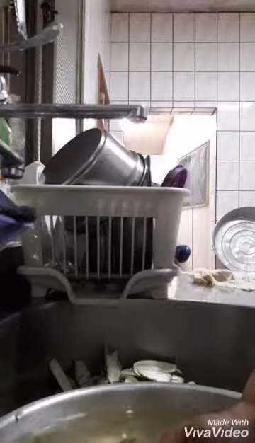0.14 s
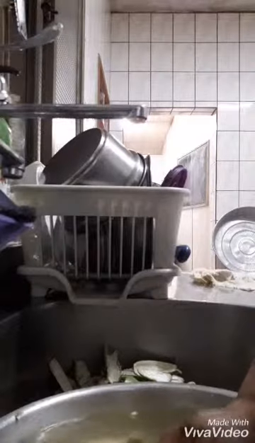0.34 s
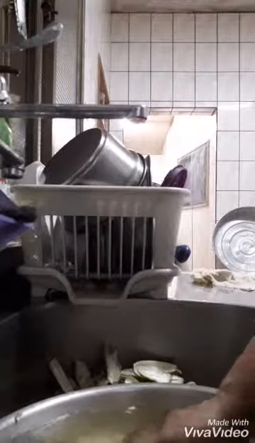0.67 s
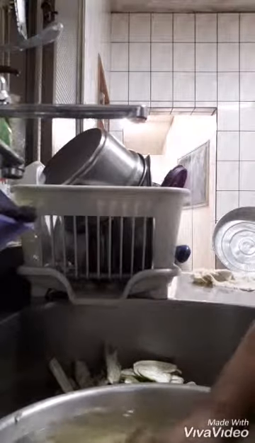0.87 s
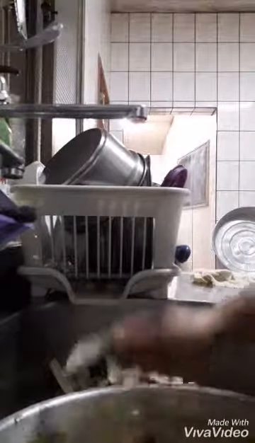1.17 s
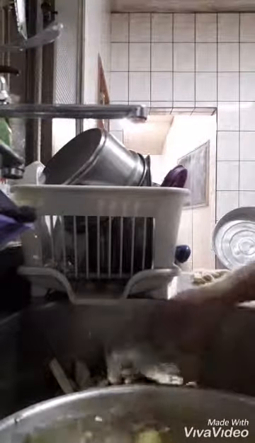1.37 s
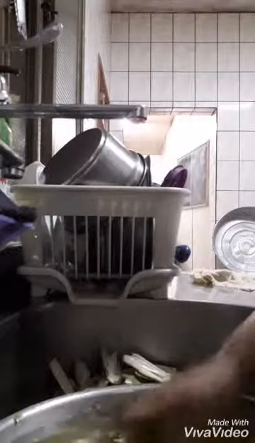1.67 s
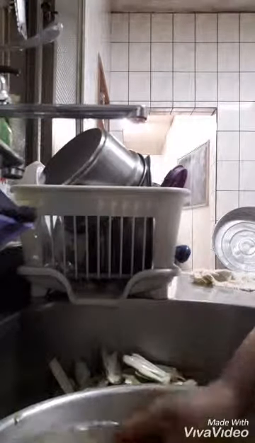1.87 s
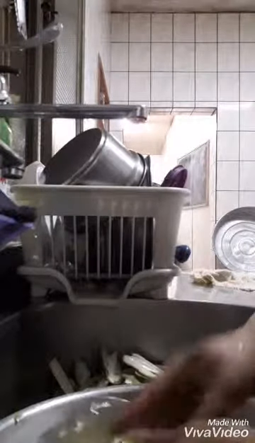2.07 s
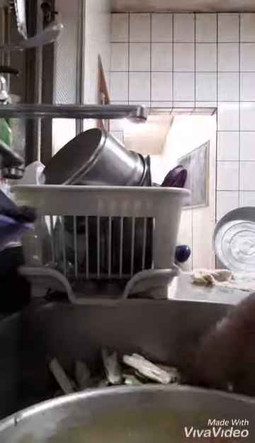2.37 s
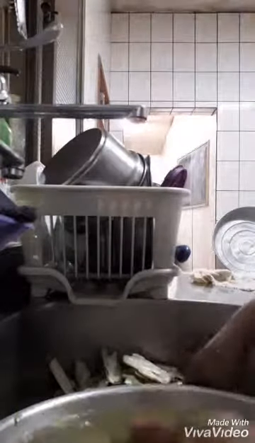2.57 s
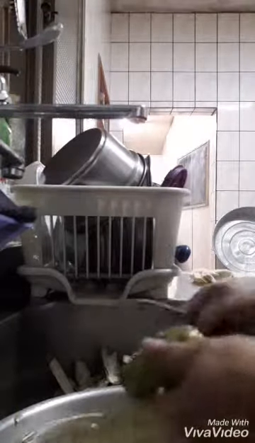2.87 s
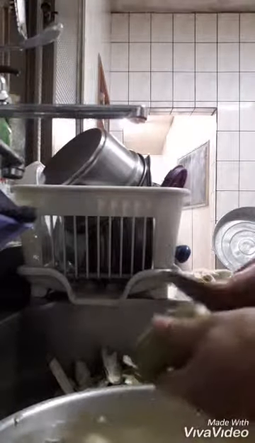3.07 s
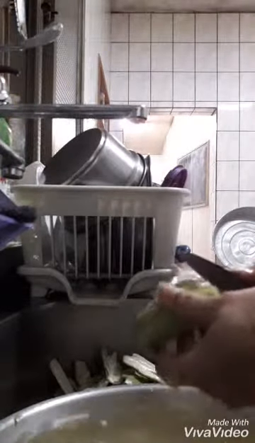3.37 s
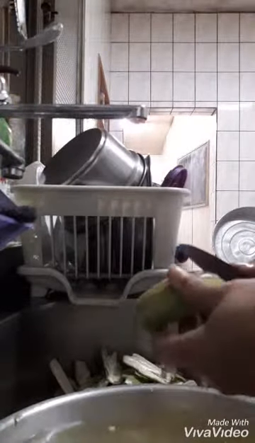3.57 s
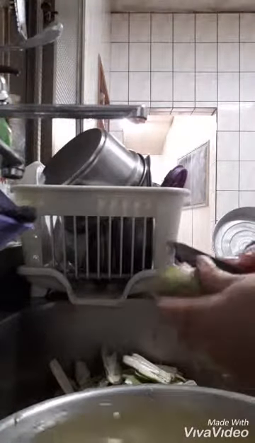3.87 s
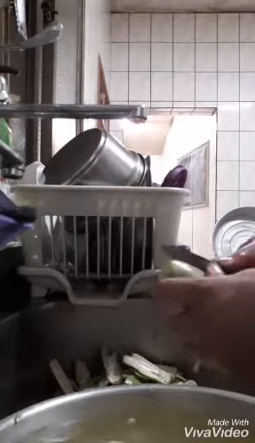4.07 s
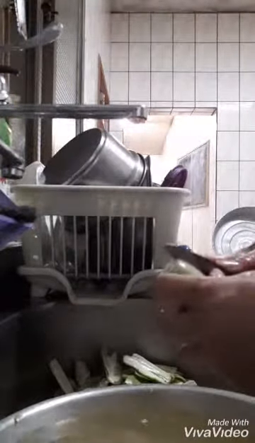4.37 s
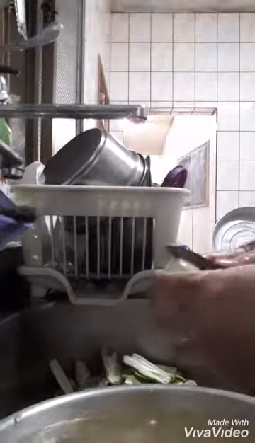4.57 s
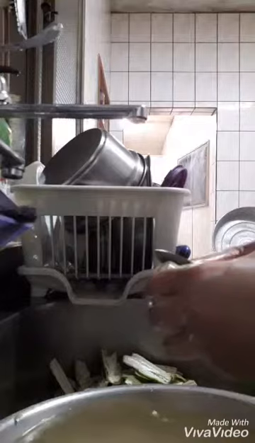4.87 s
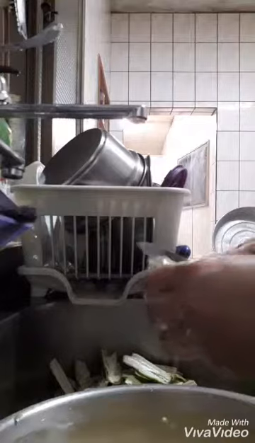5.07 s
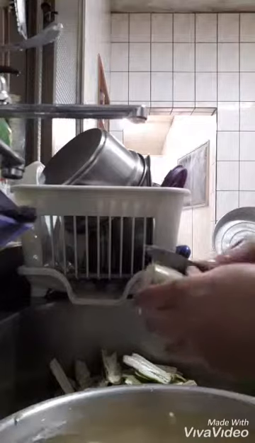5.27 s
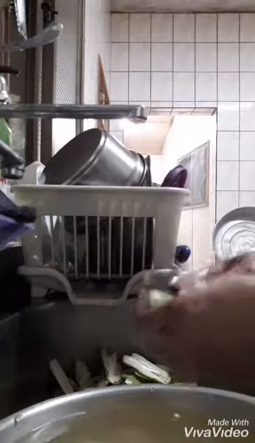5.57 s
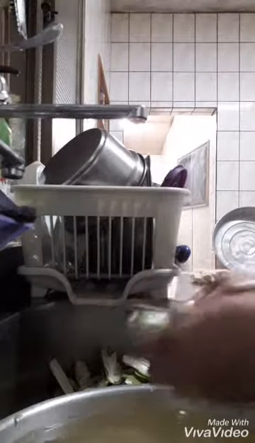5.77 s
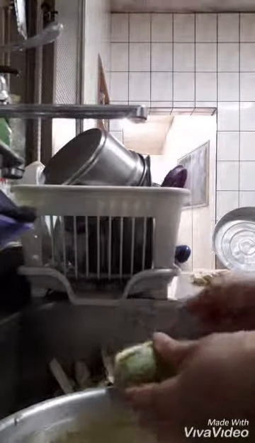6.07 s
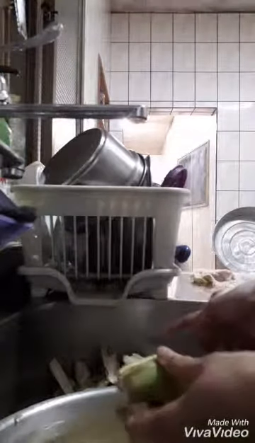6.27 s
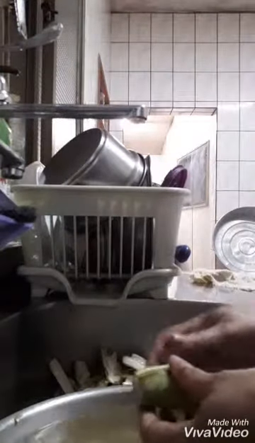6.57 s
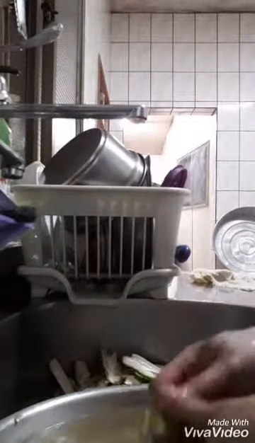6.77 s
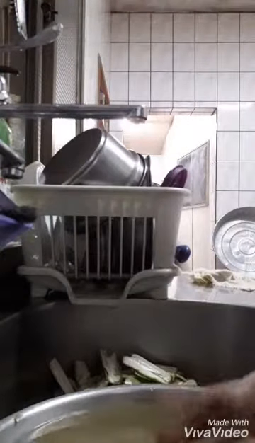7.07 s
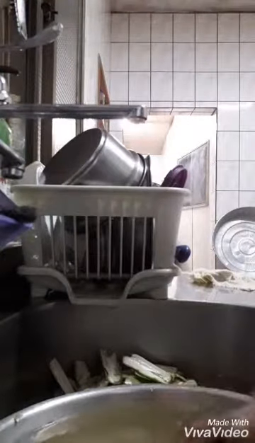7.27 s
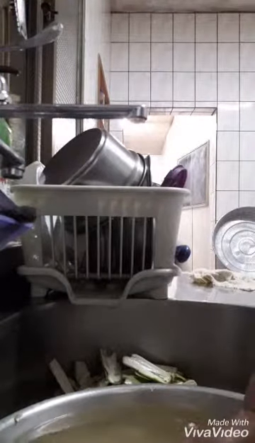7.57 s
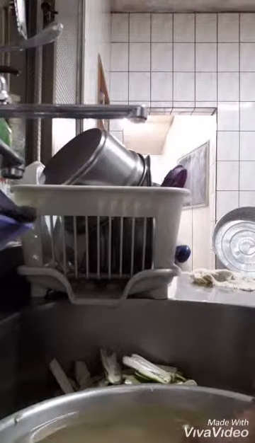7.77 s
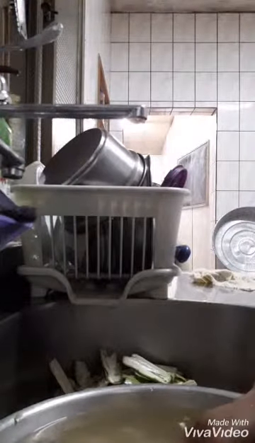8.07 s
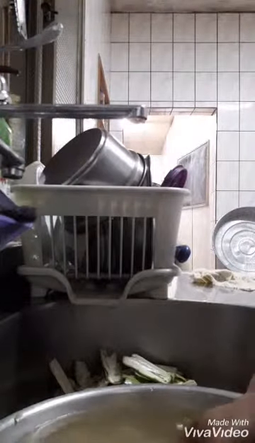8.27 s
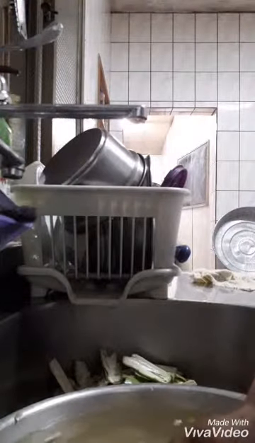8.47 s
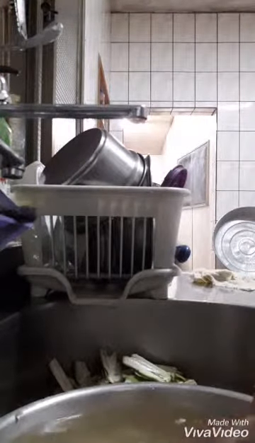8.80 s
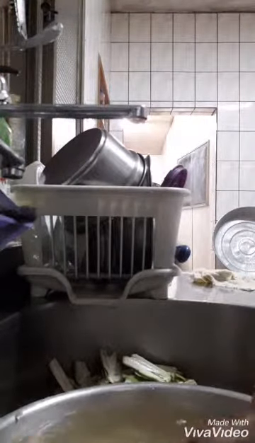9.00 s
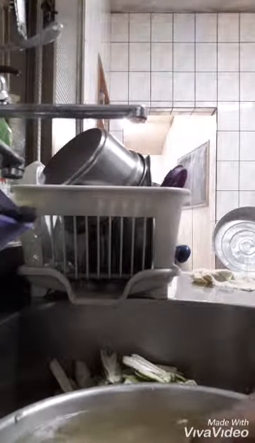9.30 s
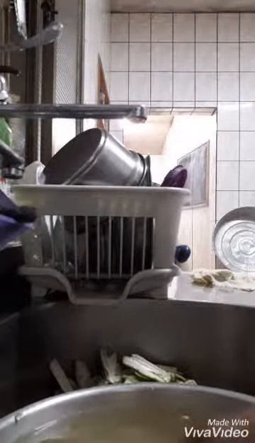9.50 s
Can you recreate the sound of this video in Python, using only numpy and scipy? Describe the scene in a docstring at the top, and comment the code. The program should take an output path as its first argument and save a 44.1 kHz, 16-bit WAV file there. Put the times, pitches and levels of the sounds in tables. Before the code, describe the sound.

A hand fishes in a metal basin of water, making small splashes, close drips and dull knocks of fruit. A knife then slits green banana skin with a faint wet crackle while a vehicle passes outside. The knife clatters loudly into the steel sink and a heavy plop follows. Everything turns quieter for a moment, then peel is torn off in wet, fibrous cracks. A fan hums throughout in the tiled kitchen.

```python
"""Green bananas are peeled over a metal basin of water in a steel sink, in a tiled kitchen with a humming fan.
First a hand fishes in the water: bubbles ring, drops splat, fruit thuds on the basin. From 3.6 s a knife
slits the skin, bursting wet cells, while a vehicle passes outside. At 6.6 s the knife drops into the sink;
the steel rings, a heavy plop follows, and the overload turns the recorder's gain down.
Last, the peel is torn off by hand in wet, fibrous cracks."""
import sys
import numpy as np
from scipy import signal
from scipy.fft import rfft, irfft
from scipy.io import wavfile
from scipy.ndimage import minimum_filter1d

SR = 44100
rng = np.random.default_rng(int(sys.argv[2]) if len(sys.argv) > 2 else 0)


def output_pcm(signal):
    """Save a mono or channel-first signal as 16-bit PCM at the path in sys.argv[1].

    Samples are clipped to [-1, 1] before scaling.
    """
    pcm = np.clip(np.atleast_2d(signal).T, -1, 1) * 32767
    wavfile.write(sys.argv[1], SR, np.round(pcm).astype(np.int16))


N = 425124
TIME = np.arange(N) / SR

# Levels in the tables are relative, ahead of filters and mix gains.
# wet snaps of hand, water and peel: t/s, level/dB, centre f/Hz
SNAPS = [(0.29, -41.5, 4870), (0.46, -26.5, 3350), (1.03, -33.5, 5370), (1.231, -39, 5170),
         (1.399, -37.5, 6400), (1.4373, -30, 6500), (1.466, -28.5, 6200), (1.61, -29.5, 8200),
         (1.647, -34.5, 6230), (1.668, -41, 8500), (1.859, -30, 2730), (1.892, -24, 4530),
         (1.904, -25, 5600), (1.9164, -14, 3940), (1.991, -32, 3700), (2.269, -31, 3630),
         (2.303, -31, 4530), (2.396, -31, 3950), (2.477, -38.5, 4600), (3.764, -39.5, 5800),
         (4.99, -34.5, 6240), (5.793, -16.5, 6700), (5.83, -28, 5500), (5.868, -28.5, 5000),
         (6.046, -41.5, 8500), (7.3085, -29.5, 2900), (7.655, -38, 6000), (7.722, -17, 3820),
         (7.729, -17, 3300), (7.747, -24, 4800), (7.764, -17.5, 2960), (7.805, -17.5, 5200),
         (7.871, -28, 4750), (9.034, -24, 7400), (9.1475, -18, 5500), (9.167, -16, 3430),
         (9.1855, -6, 3320), (9.246, -24, 6000), (9.275, -26, 3800), (9.293, -21, 4000),
         (9.318, -25.5, 4450), (9.462, -39, 6000), (9.481, -27.5, 5540)]
# spectrum of wet cracks and splats: f/Hz, level/dB
WET_SPECTRUM = [(100, -15.5), (350, 9.5), (650, 1.5), (1300, 2.5), (2200, 2), (3100, -1), (5000, -1),
                (7000, 0.5), (8500, 1.5), (10000, -4.5), (11000, -6)]
# strips of peel pulled off: t/s, length/s, level/dB, centre f/Hz
TEARS = [(0.219, 0.041, -34.5, 3100), (5.78, 0.11, -27, 5500), (7.221, 0.15, -28.5, 5800),
         (7.37, 0.58, -35.5, 5000), (7.721, 0.053, -16, 3530), (8.821, .18, -35.5, 7430),
         (9.01, 0.067, -25, 7650), (9.156, 0.13, -20, 3900)]
# squeak of pulled wet peel: f/Hz, width/Hz, boost/dB
SQUEAK = [(2950, 250, 1), (8130, 260, 7)]
# blade slides under the skin: t/s, length/s, level/dB, centre f/Hz
SLICES = [(3.616, 0.69, -40.5, 4430), (4.594, 0.03, -42, 8500), (4.817, 0.66, -40, 7260),
          (5.127, 0.15, -26.5, 8500), (5.727, 0.17, -25.5, 7900)]
# ring of the blade: f/Hz, width/Hz, boost/dB
BLADE_RING = [(5500, 300, 2.5), (8400, 600, 0)]
# hollow of the sink: f/Hz, width/Hz, boost/dB
SINK_HOLLOW = [(1204, 71, 6), (1640, 70, 2), (2907, 160, 5.5), (3270, 65, 4), (3890, 140, -0.5),
               (4700, 120, 3.5)]
# dropped knife lands and bounces: t/s, level/dB, cut-off f/Hz
BOUNCES = [(6.5907, -4.5, 9000), (6.616, -5.5, 4500), (6.6193, -1.5, 4800), (6.625, -6, 4500),
           (6.648, -5, 4200), (6.659, -6.5, 3800), (6.675, -4, 2600)]
# spectrum of knife on sink: f/Hz, level/dB
CLASH_SPECTRUM = [(40, -51.5), (150, -10.5), (600, -9), (850, -6.5), (1100, -8.5), (1400, -3), (2000, -2.5),
                  (2800, -3), (4200, 4), (5500, -4.5), (8000, -8.5), (11000, -20.5), (16000, -38.5)]
# modes of sink and blade: f/Hz, level/dB, unstretched t60/s
STEEL_MODES = [(356, -15, .33), (428, -10, .3), (718, -5.5, .25), (1000, -4.5, .26), (1245, -5, .22),
               (1270, -5, .32), (1407, -3, .25), (1490, -7, .25), (1526, 0, .3), (1593, -1, .26),
               (1655, -11, .4), (1765, -13, .33), (1975, -11, .25), (2083, -0.5, .38), (2130, -6, .34),
               (2250, -9, .33), (2385, -7.5, .27), (2406, -8, .3), (2579, -8, .22), (2625, -8, .25),
               (2672, -5, .27), (2719, -6, .29), (2790, -8, .25), (2895, -7, .25), (3085, -8, .24),
               (3657, -5, .19), (3780, -10, .2), (3978, -10, .2), (4107, -7, .22), (4297, -2, .15),
               (4533, -9, .18), (4791, -8, .22), (5733, -14, .22), (7200, -14, .26), (8140, -15, .3)]
# hand dips into the water: t/s, length/s, gurgle/dB, spray/dB
DIPS = [(0.5, 0.17, -48, -57), (1.207, 0.29, -69, -46), (1.6, 0.025, -40.5, -42.5),
        (1.87, 0.26, -47, -43.5), (2.214, 0.095, -69, -42.5), (2.685, 0.36, -68, -60)]
# drops and plops: t/s, level/dB, bubble f/Hz, splat re bubble/dB
DRIPS = [(0.248, -31, 1810, -6), (1.043, -21, 1025, 1.5), (1.056, -22.5, 990, -8), (1.219, -42, 3820, 0),
         (1.254, -37, 8300, -4), (1.272, -30.5, 4180, -13), (1.33, -21, 6400, -7), (1.417, -26, 7000, -4),
         (1.422, -22.5, 2550, -9), (1.433, -20.5, 3450, -12), (1.436, -18, 7300, -10),
         (1.467, -24.5, 3630, -5), (1.499, -30, 2400, 0), (1.549, -30, 6240, -13), (1.613, -28, 933, -1),
         (1.629, -31, 1310, -1), (1.823, -32, 6000, 2), (1.925, -21.5, 856, -10), (2.105, -20, 3330, -4),
         (2.1058, -9.5, 3930, -10), (2.165, -31, 654, -6), (2.203, -26.5, 2380, 2), (2.222, -29, 2280, 8),
         (2.234, -28.5, 930, -8), (2.27, -21, 1223, -19), (2.727, -40.5, 4220, 9), (2.788, -40.5, 8200, 1),
         (2.825, -35, 3350, -2), (2.842, -34.5, 4070, -2), (2.869, -30.5, 2510, 0), (2.963, -41, 9500, -3),
         (2.989, -36.5, 7200, 0), (3.009, -42, 8100, -3), (3.066, -25, 2140, -1), (3.066, -26.5, 2950, -14),
         (3.069, -22.5, 4140, -21), (3.086, -38, 7200, -1), (3.174, -17, 2480, -5.5),
         (3.184, -36, 9000, -4), (3.2093, -23, 3300, -1.5), (3.244, -39, 9250, -2),
         (3.28, -29.5, 4000, -14), (3.416, -27.5, 5880, -6.5), (4.298, -26, 5600, -6),
         (6.7496, 1, 322.5, -11), (7.101, -28, 3240, -8), (8.14, -41, 7040, 3.5), (8.451, -44.5, 6000, 3.5),
         (8.515, -30, 3080, -3), (8.68, -42, 5000, -0.5)]
# fruit and hand hit the basin: t/s, level/dB, cut-off f/Hz, thud f/Hz
KNOCKS = [(0.458, -22.5, 1490, 300), (0.514, -21, 600, 290), (0.527, -29, 600, 380),
          (0.555, -27.5, 1290, 620), (0.609, -28.5, 1300, 600), (0.638, -33, 1500, 700),
          (0.977, -30.5, 450, 210), (1.598, -32, 900, 570), (1.922, -25, 1500, 500), (1.972, -29, 500, 180),
          (1.992, -23.5, 900, 480), (2.011, -31, 900, 600), (2.038, -29, 900, 450), (2.056, -25, 600, 210),
          (2.69, -29, 800, 460), (6.748, 8, 650, 310), (6.757, 7.5, 1000, 400), (7.85, -25, 895, 600),
          (9.187, -15, 1500, 400)]
# modes of the water-damped basin: f/Hz, level/dB, t60/s
BASIN_MODES = [(227, -8, 0.1), (266, -2, 0.065), (320, 2, 0.074), (358, -5.5, 0.091), (410, -0.5, 0.046),
               (567, -18.5, 0.042), (853, 5, 0.022), (1804, 10.5, 0.05), (2625, 20, 0.069)]
# modes of its rim: f/Hz, level/dB, t60/s
RIM_MODES = [(1766, -4, 0.14), (2540, 0, 0.054), (3480, -18, 0.092), (4620, -12, 0.11), (5980, -3, 0.064)]
# brushed metal wall sings in one mode: t/s, level/dB, f/Hz, t60/s
WALL_TONES = [(1.615, -34.5, 940, 0.27), (1.925, -42, 810, 0.3), (9.485, -48, 1674, 0.98)]
# engine firing rate: t/s, f/Hz
FIRING_RATE = [(3.2, 42.01), (6.55, 71.33), (7.4, 70.7), (9.64, 60.6)]
# exhaust and street resonances: f/Hz, width/Hz, level/dB
EXHAUST = [(167, 9.7, 2), (208, 30, -2), (336, 26, 4.5), (611.5, 50, 3), (770, 79, 1.5), (912.3, 16, 2.5)]
# low modes of the kitchen: f/Hz, width/Hz, level/dB
ROOM_MODES = [(47.44, 2.5, 9), (56, 2.8, 4.5), (61, 2, -8.5)]
# tyre noise: f/Hz, level/dB
TYRE_SPECTRUM = [(40, -24.5), (95, -17.5), (160, -4), (230, -0.5), (340, -0.5), (450, -4.5), (850, -1.5),
                 (1500, -4), (3000, -6), (5000, -11.5), (8000, -17.5), (10000, -27), (11000, -40)]
# swells of the street boom: peak t/s, 1/e half-length/s, level/dB
BOOMS = [(1.45, 0.19, -45), (2.098, 0.26, -51), (5.4, 0.82, -41.5), (7.001, 0.26, -45)]
# air rush of the fan: f/Hz, level/dB
FAN_SPECTRUM = [(25, -46), (45, -15), (62, 0), (85, -3), (130, 7), (200, 0.5), (400, -7), (850, -4.5),
                (1400, -7), (2700, -11.5), (4000, -17), (8300, -23.5), (11000, -37)]
# microphone port resonances: f/Hz, width/Hz, boost/dB
MIC_PORT = [(2960, 2200, -1), (6230, 300, 1), (8400, 420, 1)]


def snaps(usual_t60_s=0.031, usual_db=-27, halving_db=31.5, rise_s=0.00075, wet_db=-19, wet_t60_s=0.1):
    """Each snap is a noise burst, the harder the shorter, with a fainter wet tail."""
    out = np.zeros(N)
    t, tail = decay(wet_t60_s)
    for s, db, hz in SNAPS:
        t60_s = usual_t60_s * 2 ** ((usual_db - db) / halving_db)
        envelope = (1 - np.exp(-t / rise_s)) * (from_db(-60 * t / t60_s) + from_db(wet_db) * tail)
        burst = resonance(rng.standard_normal(len(t)) * envelope, hz, 0.72 * hz)
        add(out, s, from_db(db) * burst / np.std(burst[:SR // 125]))  # rms of the first 8 ms
    return coloured(out, WET_SPECTRUM)


def peel(uneven_db=4, ticks_db=-60):
    """Fibres part in a dense crackle with each pull; wet fingers tick in between."""
    out = np.zeros(N)
    fibres = grains(per_s=2500, spread_db=0.5) * from_db(uneven_db * drift(140))
    for start_s, length_s, db, hz in TEARS:
        pull = resonance(fibres[int(start_s * SR):int((start_s + length_s) * SR)], hz, 1.56 * hz)
        add(out, start_s, from_db(db) * swelled(pull, crest_share=0.58, edge_db=-14))
    t, fade = decay(t60_s=0.025)
    ticks = signal.oaconvolve(grains(per_s=8, spread_db=2), fade * rng.standard_normal(len(t)))[:N]
    ticks = rms_one(resonance(ticks, hz=7000, width_hz=7000))
    return coloured(boosted(out, SQUEAK) + from_db(ticks_db) * ticks, WET_SPECTRUM)


def cutting(uneven_db=3, saw_start_s=3.88, saw_every_s=0.098, saw_length_s=0.05, saw_hz=6270):
    """The blade bursts wet cells in a fine crackle: slices and five ever harder sawing strokes."""
    out = np.zeros(N)
    cells = grains(per_s=3500, spread_db=2.5) * from_db(uneven_db * drift(160))
    sawing = [(saw_start_s + k * saw_every_s, saw_length_s, -40 + 1.5 * k, saw_hz) for k in range(5)]
    for start_s, length_s, db, hz in sawing + SLICES:
        stroke = double_resonance(cells[int(start_s * SR):int((start_s + length_s) * SR)], hz, hz)
        add(out, start_s, from_db(db) * swelled(stroke, crest_share=0.34, edge_db=-12))
    return coloured(boosted(out, BLADE_RING), WET_SPECTRUM)


def knife_clatter(crack_db=-1, crack_t60_s=0.04, wash_db=-12, body_t60_s=0.45, treble_t60_s=0.26):
    """Each bounce gives a hard crack and a wash of crowded modes; the high ones die first."""
    out, t = np.zeros(N), TIME[:SR]
    for s, db, cutoff_hz in BOUNCES:
        noise = rng.standard_normal(SR)
        body = lowpass(noise, 3000, order=1)
        wash = body * from_db(-60 * t / body_t60_s) + (noise - body) * from_db(-60 * t / treble_t60_s)
        blow = from_db(crack_db - 60 * t / crack_t60_s) * noise + from_db(wash_db) * wash
        add(out, s, from_db(db) * lowpass(coloured(blow, CLASH_SPECTRUM), cutoff_hz, order=1))
    return highpass(out, 130)


def steel_ring(ring_db=-9, t60_stretch=1.47, rocking_rad=0.33, rocking_per_s=70, beating_db=2):
    """Each bounce adds energy to the clear modes of the steel; the rocking blade makes them waver."""
    out, t = np.zeros(N), TIME[:SR]
    bounce_s, bounce_db, cutoff_hz = np.transpose(BOUNCES)
    since_s = t - (bounce_s - bounce_s[0])[:, None]
    for hz, db, t60_s in STEEL_MODES:
        energy_in = from_db(bounce_db + db + ring_db) ** 2 / (1 + (hz / cutoff_hz) ** 2)
        share_left = (since_s >= 0) * from_db(-60 * np.abs(since_s) / (t60_stretch * t60_s)) ** 2
        phase = rng.uniform(0, 2 * np.pi) + rocking_rad * drift(rocking_per_s)[:SR]
        beating = from_db(beating_db * drift(rocking_per_s)[:SR])
        amplitude = np.sqrt(energy_in @ share_left) * beating
        add(out, bounce_s[0], amplitude * np.sin(2 * np.pi * hz * t + phase))
    return out


def water(stir_end_s=3.3):
    """Stirring makes a lumpy slosh, a gurgle of large bubbles and a spray of small ones."""
    stirring = TIME < stir_end_s
    large = bubble_crowd(stir_end_s, low_hz=400, high_hz=1500, count=2400)
    small = bubble_crowd(stir_end_s, low_hz=2200, high_hz=9800, count=900)
    slosh = rms_one(double_resonance(grains(per_s=700, spread_db=-0.5), hz=520, width_hz=500))
    spatter = stirring * coloured(grains(per_s=1500, spread_db=5.5), WET_SPECTRUM)
    gurgle = from_db(-6) * large / np.std(large[stirring]) + from_db(-5) * slosh
    spray = from_db(-2) * small / np.std(small[stirring]) + spatter
    gurgle_gain, spray_gain = dip_gains()
    return gurgle_gain * gurgle + from_db(-3) * spray_gain * spray


def dip_gains(attack_db_per_s=346, settle_db_per_s=122):
    """Each dip stirs the water up quickly, holds it, then lets it settle."""
    gurgle, spray = np.zeros((2, N))
    for start_s, length_s, gurgle_db, spray_db in DIPS:
        before_s = np.maximum(start_s - TIME, 0)
        after_s = np.maximum(TIME - start_s - length_s, 0)
        envelope = from_db(-attack_db_per_s * before_s - settle_db_per_s * after_s)
        gurgle += from_db(gurgle_db) * envelope
        spray += from_db(spray_db) * envelope
    return gurgle, spray


def bubble_crowd(end_s, low_hz, high_hz, count, range_db=16):
    """Bubbles of random time, pitch and strength; each rings 14 cycles plus 14 ms."""
    out = np.zeros(N)
    for when, height, weakness in rng.random((count, 3)):
        hz = low_hz * (high_hz / low_hz) ** height
        plip = bubble(hz, t60_s=14 / hz + 0.014, rise=0.024)
        add(out, when * end_s, from_db(-range_db * weakness) * plip)
    return out


def bubble(hz, t60_s, rise=0.073, wobble=0.046):
    """A trapped bubble rings, rising in pitch near the surface and wobbling as its shape settles."""
    t, fade = decay(t60_s)
    shape = np.interp(t, np.linspace(0, t[-1], 20), rng.standard_normal(20))
    pitch_hz = hz * (1 + rise * np.tanh(4 * t / t60_s - 0.5) + wobble * shape)
    return fade * (1 - np.exp(-t * hz / 2)) * np.sin(2 * np.pi * np.cumsum(pitch_hz) / SR)


def drips(t60_at_1khz_s=0.053, splat_rise_s=0.0012, aloft_s=0.07, droplet_db=-20, spread_octaves=0.45):
    """Each drop splats and traps a bubble; four droplets fall back just after."""
    out = np.zeros(N)
    t, fade = decay(t60_s=0.031)
    splat_envelope = fade * (1 - np.exp(-t / splat_rise_s))
    for s, db, hz, splat_db in DRIPS:
        t60_s = t60_at_1khz_s * (1000 / hz) ** 0.37  # smaller bubbles die sooner
        add(out, s, from_db(db) * bubble(hz, t60_s, rise=0.049, wobble=0.065))
        splat = resonance(splat_envelope * rng.standard_normal(len(t)), hz, 0.93 * hz)
        add(out, s, from_db(db + splat_db) * coloured(splat, WET_SPECTRUM))
        for delay, height in rng.random((4, 2)):
            droplet_hz = hz * 2 ** (spread_octaves * (2 * height - 1))
            add(out, s + aloft_s * delay, from_db(db + droplet_db) * bubble(droplet_hz, t60_s))
    return highpass(out, 150, order=4)


def knocks(thud_db=-3, thud_t60_s=0.026, ring_db=-12):
    """Soft contacts thud, pitched by the spot, and reach only the low modes of the basin."""
    out = np.zeros(N)
    for s, db, cutoff_hz, thud_hz in KNOCKS:
        thud = from_db(thud_db - 60 * TIME[:SR] / thud_t60_s) * rng.standard_normal(SR)
        ringing = from_db(ring_db) * struck(BASIN_MODES, scatter_db=1.5)
        blow = resonance(thud, thud_hz, 0.61 * thud_hz) + ringing
        add(out, s, from_db(db) * lowpass(blow, cutoff_hz, order=4))
    return highpass(out, 143, order=4)


def rim(tap_s=0.459, tap_db=-29):
    """Bare metal above the water rings when tapped by the fruit or brushed."""
    out = np.zeros(N)
    add(out, tap_s, from_db(tap_db) * struck(RIM_MODES, scatter_db=0.5))
    for s, db, hz, t60_s in WALL_TONES:
        t, fade = decay(t60_s)
        add(out, s, from_db(db) * fade * np.sin(2 * np.pi * hz * t))
    return out


def struck(modes, scatter_db):
    """One blow: each mode answers with a strength and sign set by a random spot."""
    out = np.zeros(SR)
    offsets_db = scatter_db * rng.standard_normal(len(modes))
    signs = rng.choice([-1, 1], len(modes))
    for (hz, db, t60_s), offset_db, sign in zip(modes, offsets_db, signs):
        t, fade = decay(t60_s)
        out[:len(t)] += sign * from_db(db + offset_db) * fade * np.sin(2 * np.pi * hz * t)
    return out


def vehicle(pass_s=5.486, street_m=17.34, speed_m_per_s=10.37, shade_db_per_rad2=16):
    """Engine and tyres swell towards the window's axis, then fade."""
    angle_rad = np.arctan(speed_m_per_s * (TIME - pass_s) / street_m)
    nearness = np.cos(angle_rad) * from_db(-shade_db_per_rad2 * angle_rad ** 2)
    note, growl = engine()
    road = coloured(rng.standard_normal(N), TYRE_SPECTRUM) + from_db(-6.5) * nearness * growl
    return nearness * (from_db(-45) * note + from_db(-36) * road)


def engine(direct_db=-26, octave_db=-12, uneven_share=0.6):
    """The engine speeds up, then eases; its note sweeps the room modes, its overtones the exhaust."""
    firing_hz = np.interp(TIME, *np.transpose(FIRING_RATE))
    cycles = np.cumsum(firing_hz * (1 + 0.003 * drift(11))) / SR
    room_gain = from_db(direct_db)
    for hz, width_hz, db in ROOM_MODES:
        room_gain += from_db(db) / (1 + (2 * (firing_hz - hz) / width_hz) ** 2)
    note = room_gain * np.sin(2 * np.pi * cycles) + from_db(octave_db) * np.sin(4 * np.pi * cycles)
    count = np.floor(cycles)
    strength = (1 - uneven_share * (count % 2)) * (1 + 0.25 * drift(60))  # every second firing is weaker
    firings = np.diff(count, prepend=0) * strength
    growl = sum(from_db(db) * double_resonance(firings, hz, width_hz) for hz, width_hz, db in EXHAUST)
    return np.sqrt(2) * note, rms_one(growl)


def street_boom(hz=156, rest_db=-59, wander_per_s=14, wander_rad=1.2, roughness=0.55):
    """A narrow, wavering drone, part tone and part noise, swells and fades."""
    swell = from_db(rest_db)
    for peak_s, half_s, db in BOOMS:
        swell += from_db(db) * np.exp(-((TIME - peak_s) / half_s) ** 2)
    phase = 2 * np.pi * hz * TIME + wander_rad * drift(wander_per_s)
    noise = drift(2 * wander_per_s) * np.sin(phase) + drift(2 * wander_per_s) * np.cos(phase)
    return swell * (roughness * noise + np.sqrt(2 * (1 - roughness ** 2)) * np.sin(phase))


def fan(air_db=-45, hum_hz=120.1, hum_db=-51.5, waver_db=1.6):
    """Rushing air with a faint whistle and a motor hum."""
    hum = np.sqrt(2) * np.sin(2 * np.pi * hum_hz * TIME + 0.3 * drift(2.9))
    hum *= from_db(hum_db + waver_db * drift(9))
    whistle = from_db(-59) * rms_one(resonance(rng.standard_normal(N), hz=3090, width_hz=180))
    return hum + whistle + from_db(air_db) * coloured(rng.standard_normal(N), FAN_SPECTRUM)


def metal_ring(metal_ring_hz=1965, start_db=-57, fade_db_per_s=3):
    """A faint metal ring, slowly dying away."""
    return from_db(start_db - fade_db_per_s * TIME) * np.sin(2 * np.pi * metal_ring_hz * TIME + drift(25))


def kitchen(x, room_db, t60_s=0.46, high_cut_hz=7000, low_cut_hz=380, gap_s=0.0041):
    """Tiles return a short, bright, diffuse tail; the bass escapes through the window."""
    t, fade = decay(t60_s)
    tail = lowpass(rng.standard_normal(len(t)) * fade * (t > gap_s), high_cut_hz, order=1)
    tail -= lowpass(tail, low_cut_hz, order=1)
    return x + from_db(room_db) * signal.oaconvolve(x, tail / np.linalg.norm(tail))[:N]


def gain_control(x, threshold_db=-7, max_cut_db=13, attack_s=0.0055, hold_s=2.24, release_db_per_s=12):
    """An overload turns the gain down quickly; it is held, then creeps back."""
    power = signal.lfilter([1 / 200], [1, 1 / 200 - 1], x ** 2)
    cut_db = np.clip(4 * (10 * np.log10(power + 1e-12) - threshold_db), 0, max_cut_db)
    size = 2 * int(hold_s * SR / 2) + 1
    held_db = -minimum_filter1d(-cut_db, size, origin=size // 2, mode="constant")
    released_db = np.maximum.accumulate(held_db + release_db_per_s * TIME) - release_db_per_s * TIME
    pole = np.exp(-1 / (attack_s * SR))
    return x * from_db(-signal.lfilter([1 - pole], [1, -pole], released_db))


def grains(per_s, spread_db):
    """Random clicks of uneven size; rms 1."""
    sizes = from_db(spread_db * np.minimum(rng.exponential(1, N), 4)) * rng.choice([-1, 1], N)
    return rms_one(sizes * (rng.random(N) < per_s / SR))


def drift(per_s):
    """Random wander; rms 1."""
    knots = rng.standard_normal(int(N / SR * per_s) + 2)
    return rms_one(np.interp(TIME * per_s, np.arange(len(knots)), knots))


def decay(t60_s):
    """Time axis and envelope of a free decay."""
    t = np.arange(int(1.5 * t60_s * SR) + 2) / SR
    return t, from_db(-60 * t / t60_s)


def swelled(x, crest_share, edge_db):
    """Shape a stroke to rise to a crest and fall; rms 1."""
    level_db = np.interp(np.linspace(0, 1, len(x)), [0, crest_share, 1], [edge_db, 0, edge_db])
    return rms_one(x * from_db(level_db))


def coloured(x, spectrum, size=4096):
    """Minimum-phase filter with the given spectrum and unit power gain."""
    hz, db = np.transpose(spectrum)
    gain_db = np.interp(np.log(np.fft.rfftfreq(size, 1 / SR) + 1), np.log(hz), db)
    cepstrum = irfft(np.log(from_db(gain_db)))[:size // 2]
    response = irfft(np.exp(rfft(2 * cepstrum, size)))
    return signal.oaconvolve(x, response / np.linalg.norm(response))[:len(x)]


def resonance(x, hz, width_hz):
    """Two-pole band-pass; peak gain 1."""
    return signal.lfilter(*signal.iirpeak(hz, hz / width_hz, fs=SR), x)


def double_resonance(x, hz, width_hz):
    """Two equal band-passes in series."""
    return resonance(resonance(x, hz, width_hz), hz, width_hz)


def boosted(x, resonances):
    """Lift or cut at each resonance."""
    return x + sum((from_db(db) - 1) * resonance(x, hz, width_hz) for hz, width_hz, db in resonances)


def lowpass(x, hz, order):
    """Butterworth low-pass."""
    return signal.sosfilt(signal.butter(order, hz, fs=SR, output="sos"), x)


def highpass(x, hz, order=2):
    """Butterworth high-pass."""
    return signal.sosfilt(signal.butter(order, hz, "high", fs=SR, output="sos"), x)


def from_db(db):
    """Decibels to gain."""
    return 10 ** (np.asarray(db) / 20)


def rms_one(x):
    """Scale to rms 1."""
    return x / np.sqrt(np.mean(x ** 2) + 1e-20)


def add(out, s, sound):
    """Mix a sound in at time s."""
    i = int(round(s * SR))
    out[i:i + len(sound)] += sound[:N - i]


def scene():
    """Work at the sink over street and fan; the drops fall closest, so they are least reverberant."""
    hands = boosted(from_db(-3.5) * snaps() + from_db(-10) * peel() + from_db(-11) * cutting(), SINK_HOLLOW)
    wet = kitchen(water(), room_db=-12) + kitchen(drips(), room_db=-15.5, t60_s=0.33)
    work = kitchen(hands + knocks() + rim(), room_db=-12)
    dropped_knife = kitchen(knife_clatter(), room_db=-5.5) + steel_ring()
    return (work + wet + dropped_knife + fan() + metal_ring() + vehicle() + street_boom())[None]


def record(dry, band_hz=10300, leak_db=-25, cutoff_hz=12500):
    """Microphone resonances, gain control, clipping, and a band limit with a faint leak above it."""
    heard = boosted(dry[0], MIC_PORT)
    clipped = highpass(np.clip(gain_control(heard), -1, 1), 35)
    band = signal.sosfilt(signal.ellip(8, 0.3, 60, band_hz, fs=SR, output="sos"), clipped)
    leaky = band + from_db(leak_db) * clipped
    return signal.sosfilt(signal.ellip(10, 0.3, 70, cutoff_hz, fs=SR, output="sos"), leaky)[None]


dry = scene()
out = record(dry)
output_pcm(out)
```